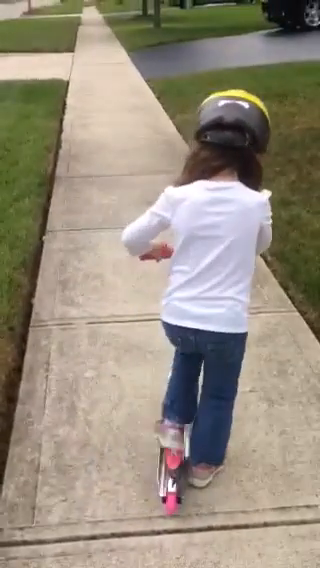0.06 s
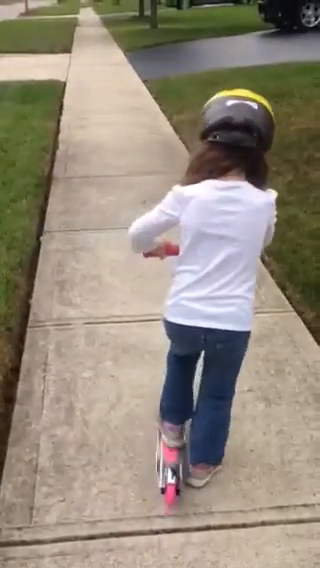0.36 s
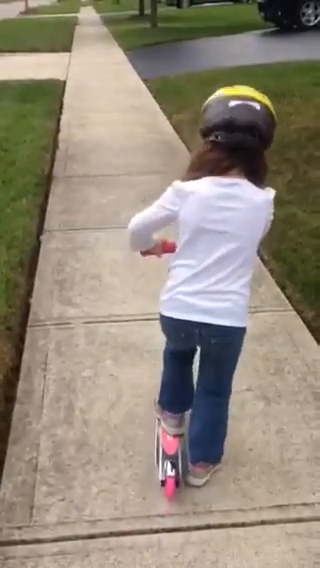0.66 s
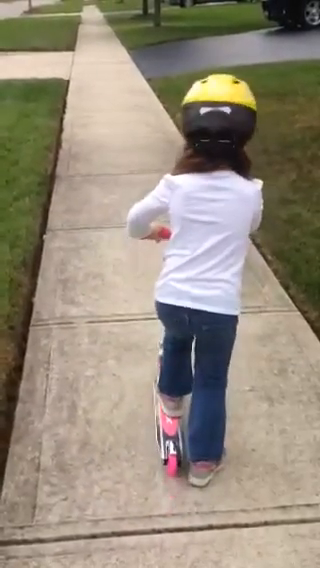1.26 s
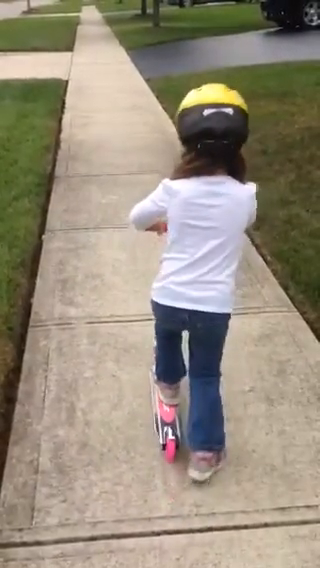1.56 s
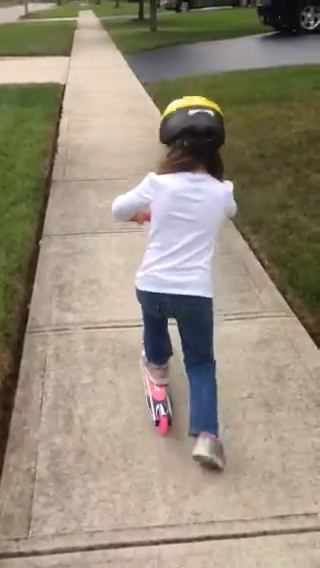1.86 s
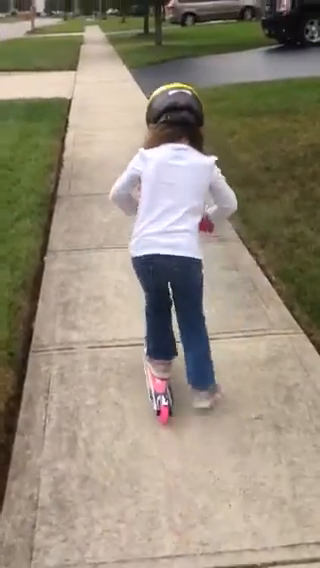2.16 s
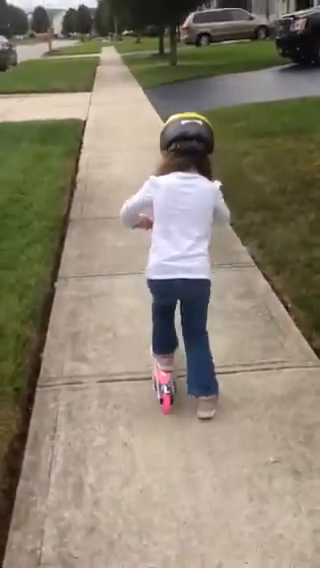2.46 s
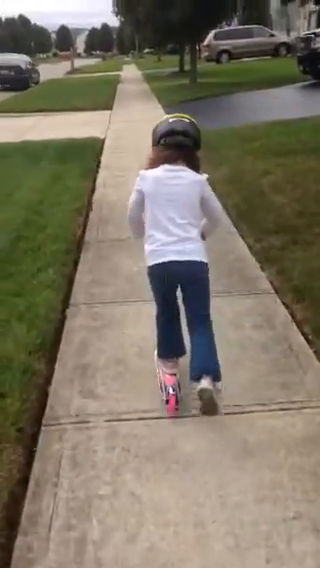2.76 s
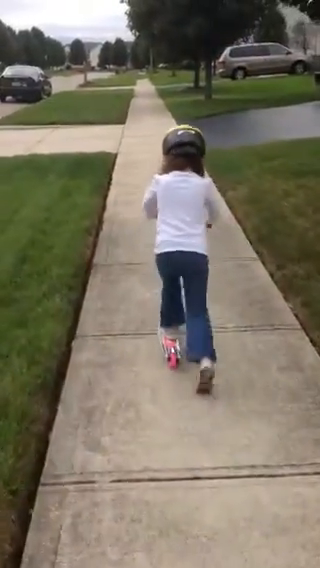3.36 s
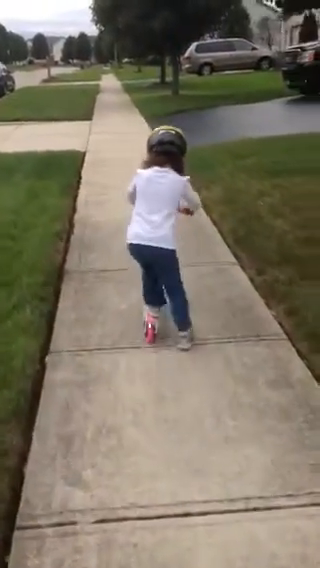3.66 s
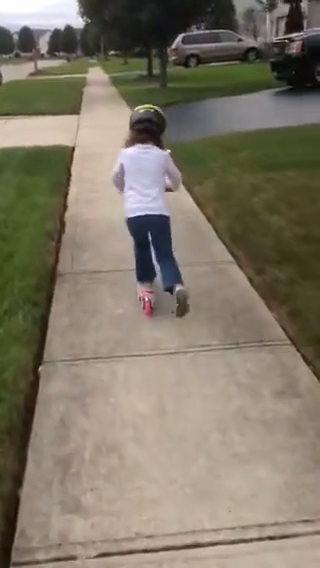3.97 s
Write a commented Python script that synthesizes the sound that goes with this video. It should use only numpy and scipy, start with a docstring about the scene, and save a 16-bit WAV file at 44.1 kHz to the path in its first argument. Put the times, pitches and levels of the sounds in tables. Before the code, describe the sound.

Scooter wheels tick over grit, then clack across sidewalk joints a few steps away and end with a short ringing scrape. Shoes brush the concrete softly, while light gusts buffet the microphone over a quiet outdoor hiss.

```python
"""On a concrete sidewalk, a child pushes a small kick scooter a few steps ahead of the microphone.
The wheels clack over joints, thumping the deck and ringing the frame, and hard scrapes ring the metal.
Grit snaps underneath and shoes scuff the ground, all with a weak echo from the street.
Light wind buffets the microphone over a steady outdoor hiss."""
import sys
import numpy as np
from scipy import signal
from scipy.fft import rfft, irfft
from scipy.io import wavfile

SR = 44100
rng = np.random.default_rng(int(sys.argv[2]) if len(sys.argv) > 2 else 0)


def master(y):
    """Save y as 16-bit WAV."""
    cut = np.clip(np.atleast_2d(y).T, -1, 1)
    pcm = np.round(cut * 32767)  # scale
    wavfile.write(sys.argv[1], SR, pcm.astype(np.int16))


N = 176400
T = np.arange(N) / SR
HZ = np.maximum(np.fft.rfftfreq(N, 1 / SR), 1)


# Wheel knocks. Each row: time in seconds, crunch level in dB, frame ring in dB, deck thump in dB,
# brightness in dB per octave.
KNOCKS = [(2.2658, -54, -44.5, -67, 1.5), (2.3241, -51, -37, -38, 1), (2.3760, -59, -58, -50, -2),
          (2.7625, -50.5, -43.5, -44, -2.5), (2.8132, -33.5, -27.5, -35, -1)]
# The tone of a knock. Each row: frequency in Hz, relative level in dB.
KNOCK_TONE = [(60, -24.5), (270, -17), (400, -2.5), (620, 2), (780, -6), (1080, 2), (1500, 0.5),
              (1900, -2.5), (3000, -11.5), (4100, -4), (5000, -16), (6300, -16), (10000, -21.5),
              (15000, -33)]
# Notes of the frame and wheel. Each row: pitch in Hz, relative level in dB, seconds to fade by 60 dB.
FRAME_NOTES = [(258, -12.5, 0.069), (542, -14.5, 0.058), (680, -15, 0.059), (1007, -13.5, 0.035),
               (1480, -13, 0.01), (1850, -0.5, 0.024), (2550, -7, 0.033), (2770, -13, 0.03),
               (3270, -16.5, 0.048), (3400, -24, 0.034), (3850, -14, 0.02)]

def wheels(strike_db=20, rebound_s=.00198, rebound_db=-1, thump_lead_s=0.003):
    """A wheel drops into a joint: the deck thumps, the far edge hits twice and crunches, the frame rings."""
    out = np.zeros(N)
    deck_hz, deck_fade_s = 183.6, 0.11
    for s, db, ring_db, thump_db, slope_db in KNOCKS:
        strike = amp(strike_db) * (click(s) + amp(rebound_db) * click(s + rebound_s))
        crunch = burst(s, rise_s=0.0023, decay_s=0.005) * rng.standard_normal(N)
        out += amp(db) * filtered(strike + crunch, tilted(KNOCK_TONE, slope_db))
        out += amp(ring_db) * ring(s, FRAME_NOTES)
        out += amp(thump_db) * ring(s - thump_lead_s, [(deck_hz, 0, deck_fade_s)])
    return out


# Hard scrapes at a joint. Each row: peak time in seconds, level in dB, rise in seconds,
# decay in seconds, brightness in dB per octave, metal ring above the grinding in dB.
HARD_SCRAPES = [(3.6880, -26.5, 0.0033, 0.0064, 0.14, 8.5), (3.737, -37.5, .003, .008, 0, 5.5)]
# The tone of the grinding. Each row: frequency in Hz, relative level in dB.
GRIND_TONE = [(150, 9.5), (600, 6), (900, -3.5), (1280, 5), (1600, 0.5), (1900, -9), (2500, -3.5),
              (3300, 2), (4150, 1.5), (4800, -3.5), (6200, -2.5), (8000, -7.5), (10800, -9), (12000, -13),
              (15000, -18)]
# Notes of the metal parts. Each row: pitch in Hz, relative level in dB, seconds to fade by 60 dB.
METAL_NOTES = [(1236, -2.5, 0.08), (1456, -9, 0.02), (2050, 2, .12), (2150, -1, 0.14), (2190, -4.5, 0.072),
               (2660, 3.5, 0.045), (3080, 0, 0.067), (4120, -6, 0.033), (5550, 2, .09), (6180, -13, 0.034),
               (10500, -3, 0.032)]

def scrapes(bite_lead_s=0.0058):
    """Longer, brighter blows bite suddenly and grind on the concrete; the grinding rings the metal."""
    out = np.zeros(N)
    # Each note boosts a narrow range of frequencies.
    metal = sum(amp(db) / (1 + 2j * np.pi * (HZ - hz) * fade_s / np.log(1000))
                for hz, db, fade_s in METAL_NOTES)
    for s, db, rise_s, decay_s, slope_db, ring_db in HARD_SCRAPES:
        contact = .5 + .5 * np.tanh((T - s + bite_lead_s) / 0.00035)  # switches on just before the peak
        grind = contact * burst(s, rise_s, decay_s) * rng.standard_normal(N)
        tone = tilted(GRIND_TONE, slope_db) * (1 + amp(ring_db) * metal)
        out += amp(db) * filtered(grind, tone)
    return out


# Snaps of grit. Each row: start in seconds, ping level in dB, ping pitch in Hz,
# seconds for the ping to fade by 60 dB, tick level in dB, wheel ring in dB.
GRIT_SNAPS = [(0.9926, -49.5, 1154, 0.038, -56, -60), (1.4487, -44, 8470, 0.0094, -31.5, -67),
              (1.4504, -40.5, 2375, 0.013, -54, -48.5), (2.0917, -41.5, 920, 0.02, -37, -62),
              (2.0929, -32, 2000, 0.0029, -75, -58), (2.3427, -48, 2860, 0.0075, -48, -60),
              (2.354, -45.5, 1370, 0.005, -56, -69), (2.4682, -51.5, 2150, 0.026, -56, -65),
              (2.5684, -57, 1530, 0.012, -51, -63), (3.4217, -46, 3300, 0.0068, -52, -58.5)]
# The tone of a tick. Each row: frequency in Hz, relative level in dB.
TICK_TONE = [(500, -20), (2000, -1.5), (3400, -5), (4800, -9), (6000, -2.5), (8400, -3), (10500, -8),
             (12500, -5), (15000, -13)]
# Notes a snap rings in the wheel. Each row: pitch in Hz, relative level in dB, seconds to fade by 60 dB.
WHEEL_NOTES = [(1833, -3, 0.037), (2336, -5, 0.049), (2470, -10, 0.054), (3235, -1.5, 0.025),
               (3794, -2, 0.016), (4230, -13, 0.022)]

def grit(crumble_db=-14):
    """Small stones snap: a sharp tick that crumbles, a short ping and a trace of ringing wheel."""
    ringing, ticks = np.zeros(N), np.zeros(N)
    for s, db, hz, fade_s, tick_db, ring_db in GRIT_SNAPS:
        ringing += amp(db) * ring(s, [(hz, 0, fade_s)]) + amp(ring_db) * ring(s, WHEEL_NOTES)
        crumble = amp(crumble_db) * burst(s, rise_s=.0001, decay_s=0.002) * rng.standard_normal(N)
        ticks += amp(tick_db) * (click(s) + crumble)
    return ringing + filtered(ticks, amp(curve(TICK_TONE, HZ)))


# Soft scuffs. Each row: peak time in seconds, level in dB, half length in seconds,
# middle frequency in Hz, width in octaves.
SHOE_SCUFFS = [(0.203, -59.5, 0.014, 2430, 1), (0.594, -63, 0.022, 2470, 0.62),
               (0.862, -68, 0.018, 2400, 0.3), (2.24, -67.5, 0.053, 2270, 0.37),
               (2.325, -60.5, 0.02, 1780, 1.2), (2.469, -54, 0.0024, 4440, .8),
               (3.345, -61.5, 0.016, 2470, 0.16), (3.37, -67, 0.036, 2630, 0.96),
               (3.74, -40.5, 0.0022, 2370, 0.45), (3.754, -47.5, 0.0069, 2080, .45)]

def shoes(grain_db=5.0):
    """Soles brush the concrete in grainy swishes."""
    grain = normalized(amp(grain_db * noise(HZ < 400)))  # a fast, random flutter in level
    return grain * sum(amp(db) * swell(s, half_s) * noise(band(hz, octaves))
                       for s, db, half_s, hz, octaves in SHOE_SCUFFS)


# The tone of the wind's rumble. Each row: frequency in Hz, relative level in dB.
RUMBLE_TONE = [(20, -34), (45, 3.5), (75, 7), (170, -2.5), (300, -16.5), (600, -21.5), (2000, -33)]
# Gusts. Each row: peak time in seconds, level in dB, half length in seconds, upper edge in Hz.
WIND_GUSTS = [(.003, -36.5, 0.0082, 245), (0.075, -46, 0.016, 204), (0.185, -37.5, 0.013, 196),
              (0.303, -48.5, 0.045, 182), (0.339, -41.5, 0.011, 400), (0.375, -52.5, 0.044, 312),
              (0.461, -44.5, 0.024, 230), (0.624, -51, 0.027, 126), (1.176, -62, 0.024, 190),
              (1.618, -51.5, 0.017, 226), (1.639, -49, 0.011, 131), (1.701, -49.5, 0.0068, 169),
              (2.235, -58.5, 0.035, 151), (2.37, -60.5, 0.11, 167), (2.657, -57, 0.014, 130),
              (3.02, -51.5, 0.03, 159), (3.13, -50.5, 0.025, 120), (3.257, -53, 0.014, 200),
              (3.5, -53.5, 0.067, 136), (3.601, -40, 0.012, 238), (3.674, -33, 0.011, 450),
              (3.697, -35.5, 0.03, 195), (3.72, -31.5, 0.015, 158), (3.773, -41.5, 0.0086, 118),
              (3.813, -43.5, 0.01, 185), (3.882, -57.5, .018, 110)]
# Pops from single swirls of air. Each row: time in seconds, level in dB, seconds from middle to peak.
WIND_POPS = [(0.348, -28.5, 0.00072), (1.882, -42.5, 0.0023), (3.6015, -30.5, 0.0015), (3.675, -27, 0.0017),
             (3.7385, -25.5, 0.00055)]

def wind(rumble_db=-64.5, waver_db=-1, gust_low_hz=56, steepness=4.4):
    """Wind hits the microphone with a low rumble, short gusts and small swirls of air that pop."""
    drift = noise((HZ < 12) / np.sqrt(HZ))
    out = amp(rumble_db + waver_db * drift) * noise(amp(curve(RUMBLE_TONE, HZ)))
    low_cut = 1 / np.sqrt(1 + (gust_low_hz / HZ) ** 6)
    for s, db, half_s, edge_hz in WIND_GUSTS:
        gentle_high_cut = 1 / np.sqrt(1 + (HZ / edge_hz) ** 2)
        steep_high_cut = 1 / np.sqrt(1 + (HZ / edge_hz) ** (2 * steepness))
        out += amp(db) * swell(s, half_s) * noise(low_cut * gentle_high_cut * steep_high_cut)
    for s, db, half_s in WIND_POPS:
        offset = (T - s) / half_s
        out -= amp(db) * offset * np.exp((1 - offset ** 2) / 2)  # one push, then one pull
    return out


# The tone of the outdoor hiss. Each row: frequency in Hz, relative level in dB.
HISS_TONE = [(120, -48), (200, 3.5), (258, -1), (326, -3), (636, -5), (946, -10), (1020, -9.5), (1170, -11),
             (2650, -12), (3800, -12), (5260, -12), (8570, -16.5), (15000, -20)]
# A thin, high sizzle. Each row: middle frequency in Hz, width in octaves, level in dB.
SIZZLE_BANDS = [(7780, 0.082, -82.5), (8640, 0.046, -86), (3590, 0.2, -80)]

def air(hiss_db=-63.5, waver_db=4, hum_db=-68.5, hum_fade_s=0.6):
    """Steady hiss, a wavering high sizzle and a faint, far hum that fades early on."""
    hiss = amp(hiss_db) * noise(amp(curve(HISS_TONE, HZ)) / (1 + (150 / HZ) ** 4))
    sizzle = sum(amp(db + waver_db * noise(HZ < 7)) * noise(band(hz, octaves))
                 for hz, octaves, db in SIZZLE_BANDS)
    hum = amp(hum_db) * np.exp(-(T / hum_fade_s) ** 2) * noise(band(hz=522, octaves=.05))
    return hiss + sizzle + hum


# How long the street echoes. Each row: frequency in Hz, seconds to fade by 60 dB.
ECHO_TIMES = [(200, 0.44), (1000, 0.093), (2500, 0.18), (6000, 0.2), (14000, 0.18)]

def street_echo(x):
    """Sound bounces off houses and cars and blurs into a short tail."""
    hz, t, spectrum = signal.stft(rng.standard_normal(SR // 2), SR, nperseg=256)
    fade = amp(-60 * t / curve(ECHO_TIMES, hz)[:, None])
    tail = signal.istft(spectrum * fade, SR, nperseg=256)[1]
    return signal.fftconvolve(x, tail / np.linalg.norm(tail))[:N]


def amp(db):
    """Turns decibels into a multiplier."""
    return 10 ** (np.asarray(db) / 20)


def normalized(x):
    """Scales a signal to an average (rms) level of 1."""
    return x / np.sqrt(np.mean(x ** 2) + 1e-20)


def curve(points, hz):
    """Joins a table's points with lines on a pitch scale."""
    frequency, value = np.transpose(points)
    return np.interp(np.log(hz + 1), np.log(frequency + 1), value)


def tilted(points, slope_db):
    """A tone made brighter or duller."""
    return amp(curve(points, HZ) + slope_db * np.log2(np.maximum(HZ / 2000, .25)))


def band(hz, octaves):
    """A bell-shaped range of frequencies."""
    return np.exp(-.5 * (np.log2(HZ / hz) / octaves) ** 2)


def noise(tone):
    """Noise with the given tone, at level 1."""
    return normalized(irfft(rfft(rng.standard_normal(N)) * tone, N))


def filtered(x, tone):
    """Gives a sound a tone, with an average (rms) gain of 1."""
    return irfft(rfft(x) * tone / np.sqrt(np.mean(abs(tone) ** 2)), N)


def click(s):
    """One sharp click at s seconds."""
    return 1. * (np.arange(N) == round(s * SR))


def burst(s, rise_s, decay_s):
    """A level that climbs to a sharp peak at s seconds and dies away."""
    return np.exp(-np.minimum(np.maximum((s - T) / rise_s, (T - s) / decay_s), 20))


def swell(s, half_s):
    """A smooth rise and fall around s seconds."""
    return np.exp(-.5 * ((T - s) / half_s) ** 2)


def ring(s, notes):
    """The fading notes of an object struck at s seconds."""
    out, t = np.zeros(N), np.arange(SR // 4) / SR
    ringing = sum((-1) ** k * amp(db - 60 * t / fade_s) * np.sin(2 * np.pi * hz * t)
                  for k, (hz, db, fade_s) in enumerate(notes))
    part = out[round(s * SR):][:len(t)]
    part += ringing[:len(part)]
    return out


def scene(echo_db=-14.5):
    """Scooter and shoes in the open street, with wind and hiss."""
    near = wheels() + scrapes() + grit() + shoes()
    return (near + amp(echo_db) * street_echo(near) + wind() + air())[None]


def record(dry):
    """Cuts the highest treble, above 15350 Hz."""
    high_cut = signal.firwin(511, 15350, window=("kaiser", 9), fs=SR)
    return signal.oaconvolve(dry, high_cut[None], "same")


dry = scene()
out = record(dry)
master(out)
```